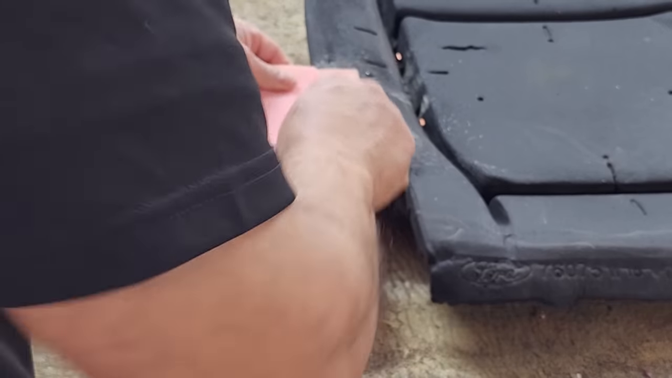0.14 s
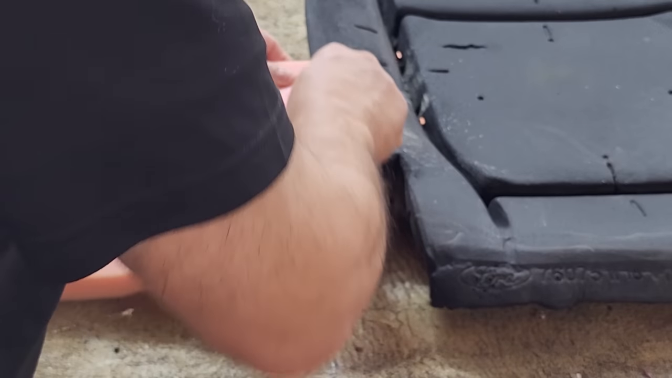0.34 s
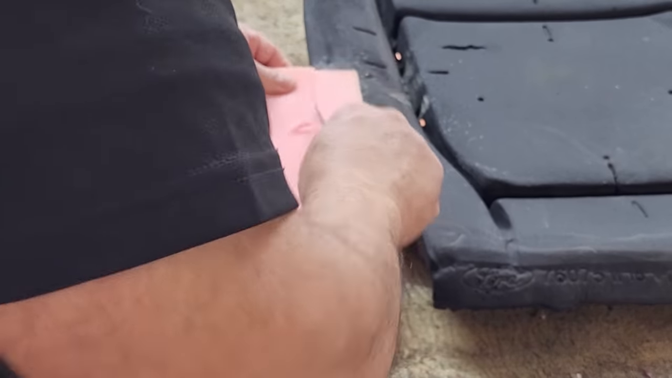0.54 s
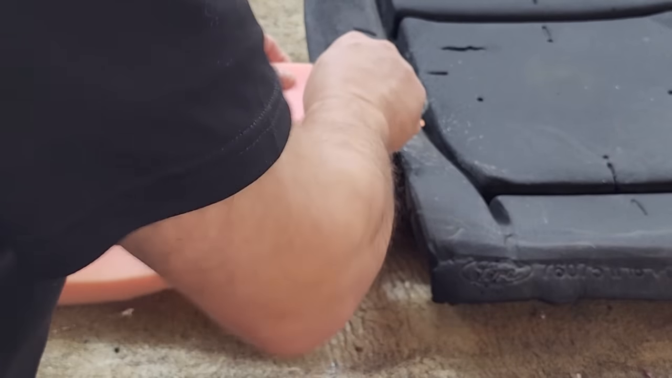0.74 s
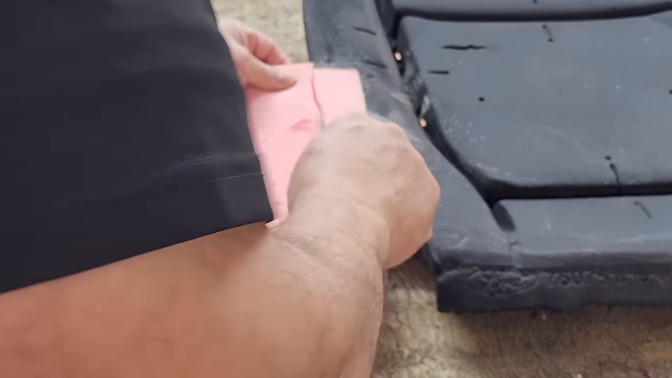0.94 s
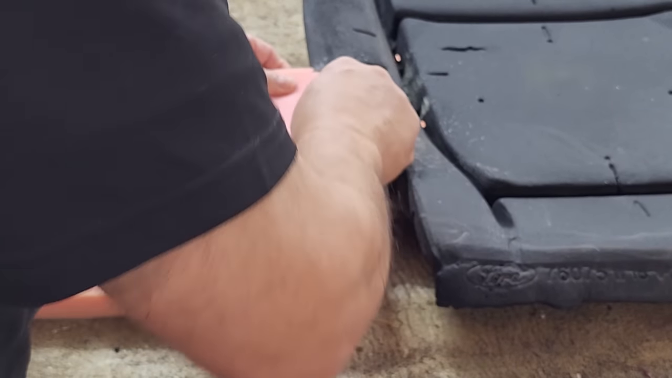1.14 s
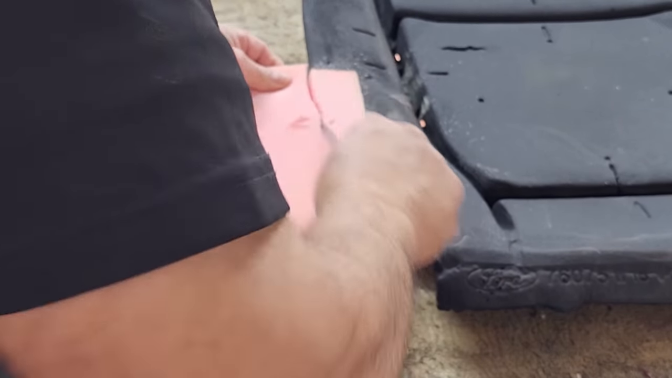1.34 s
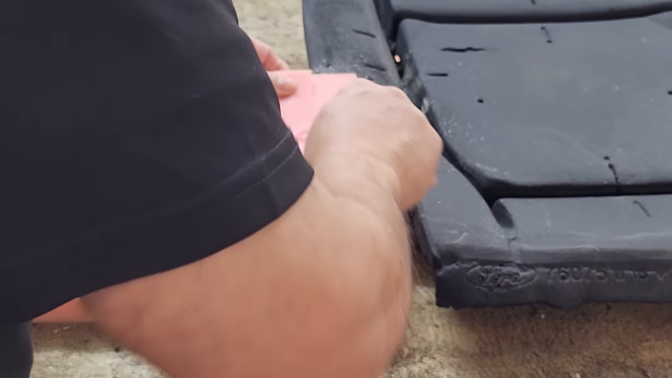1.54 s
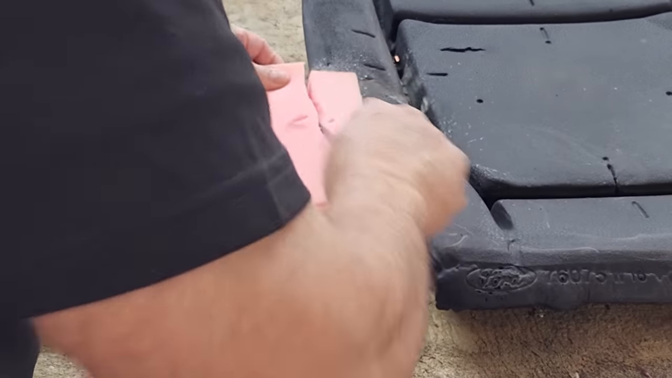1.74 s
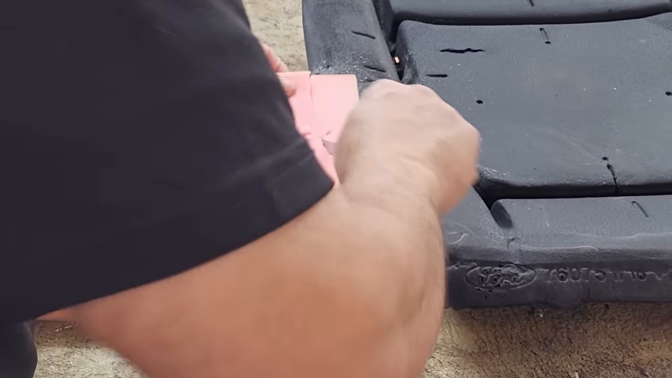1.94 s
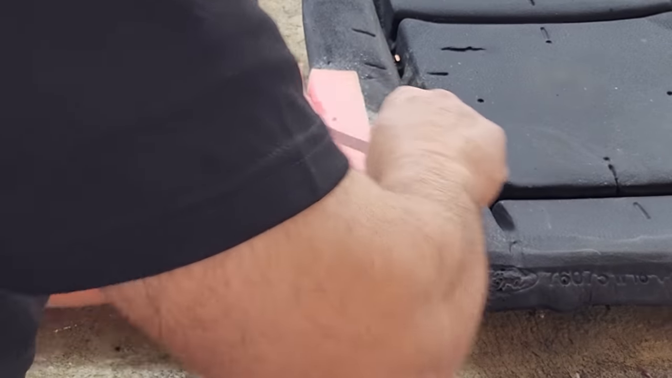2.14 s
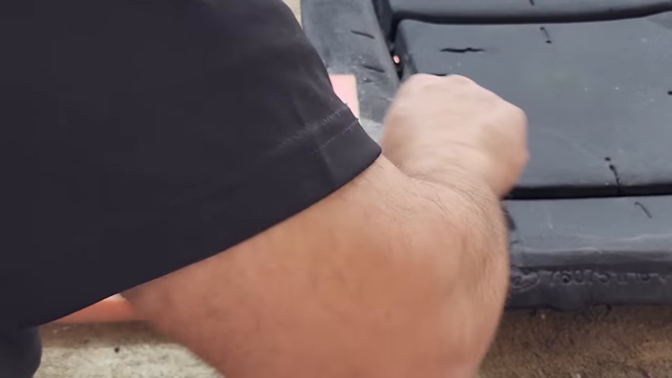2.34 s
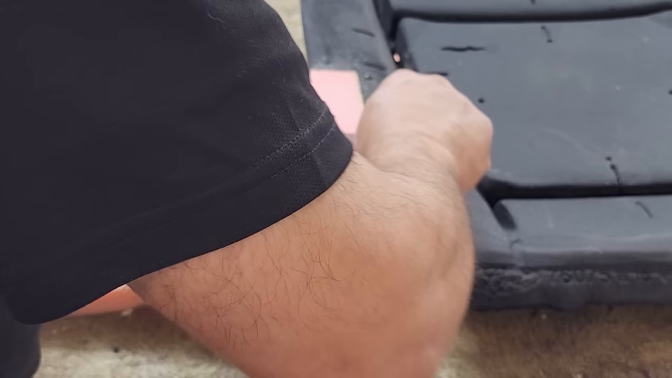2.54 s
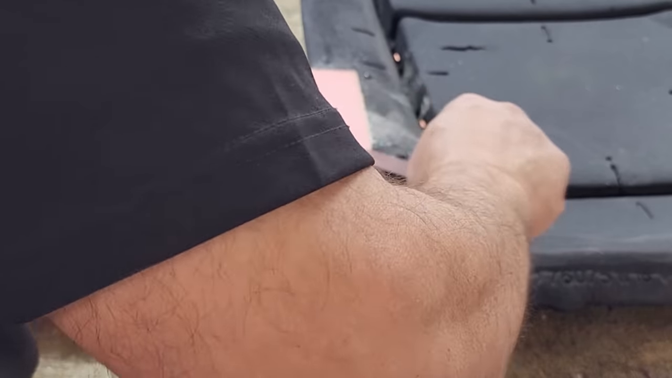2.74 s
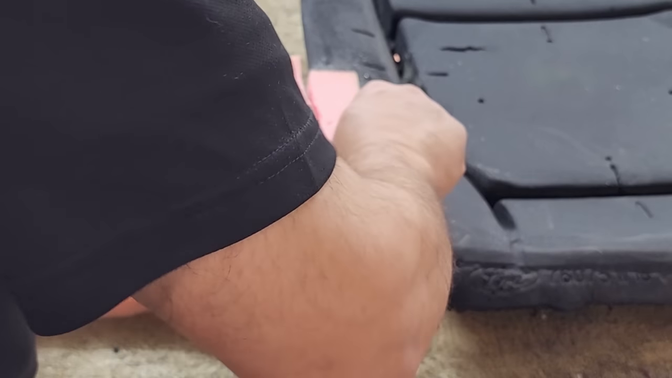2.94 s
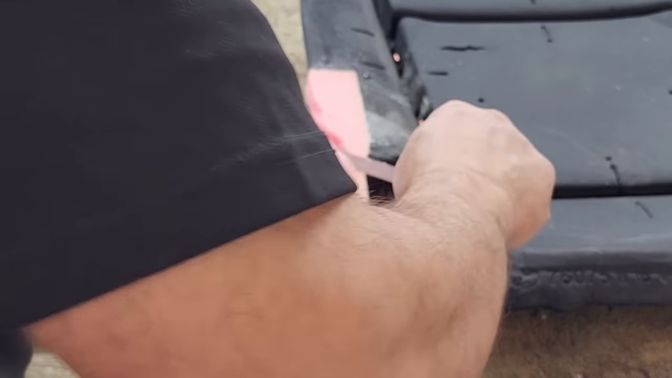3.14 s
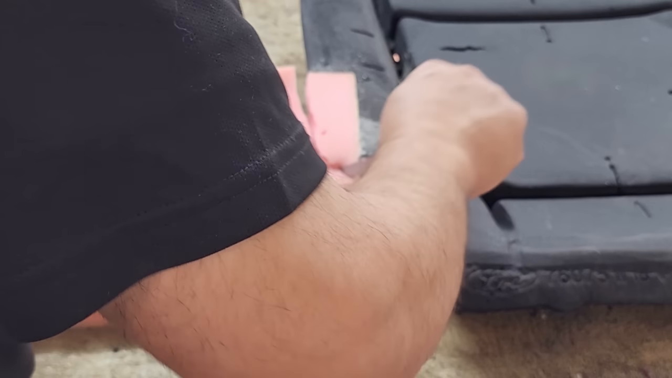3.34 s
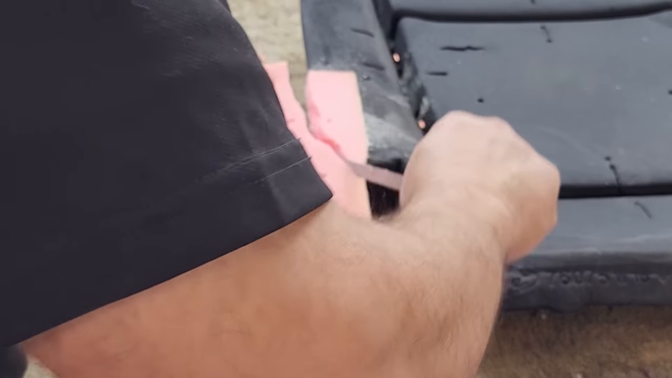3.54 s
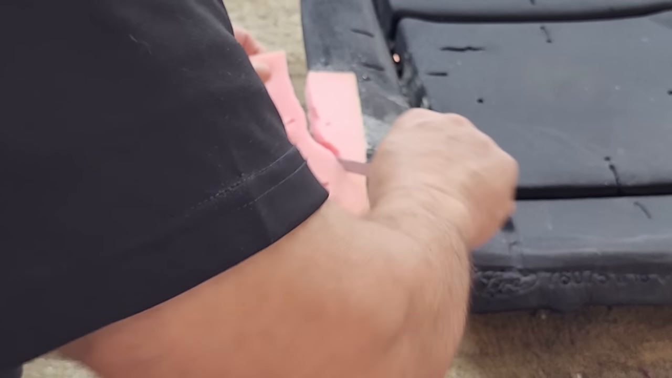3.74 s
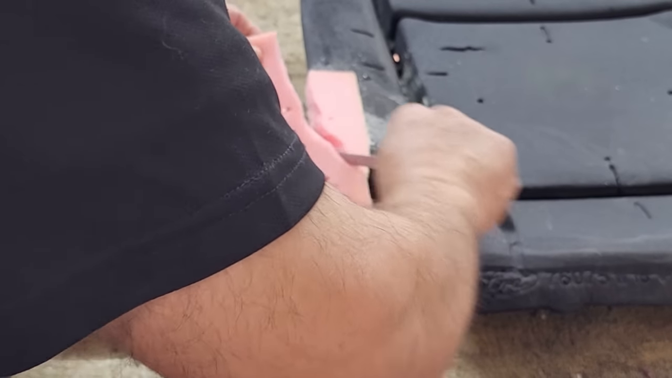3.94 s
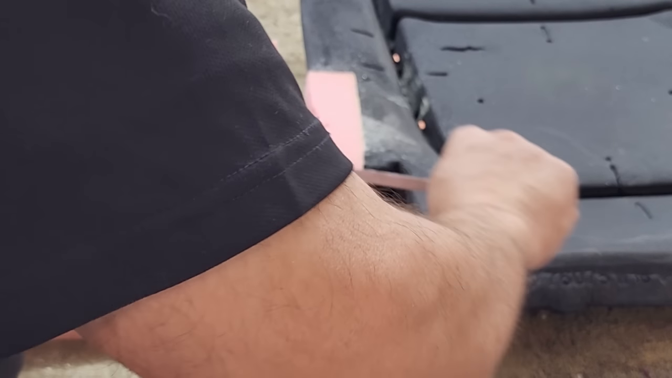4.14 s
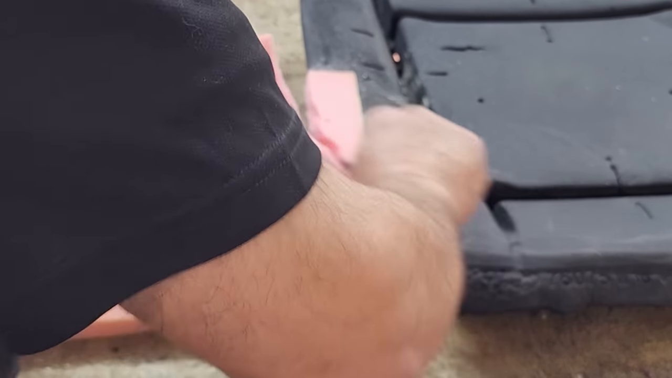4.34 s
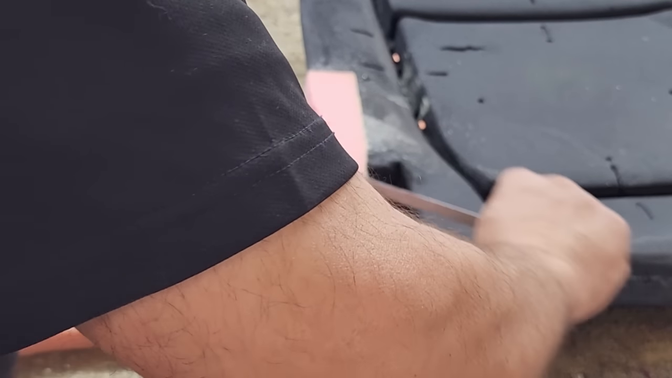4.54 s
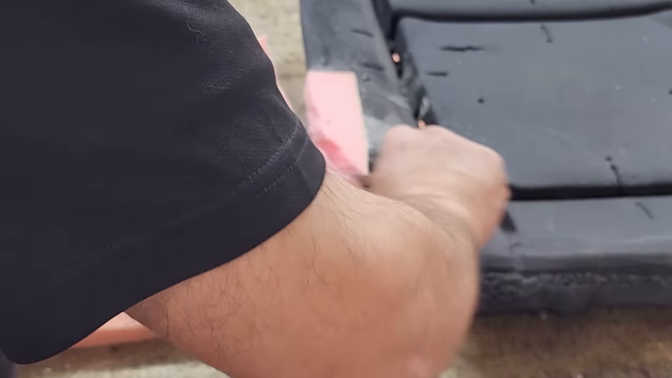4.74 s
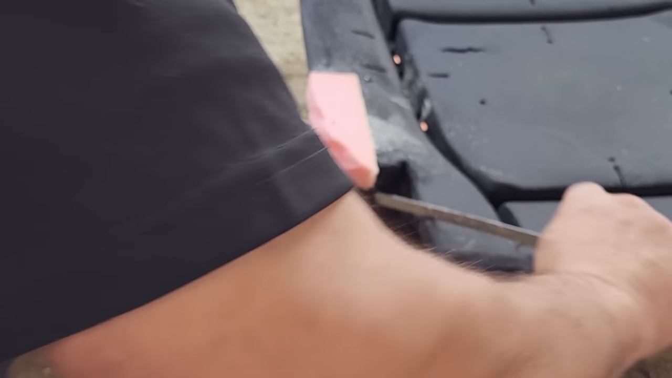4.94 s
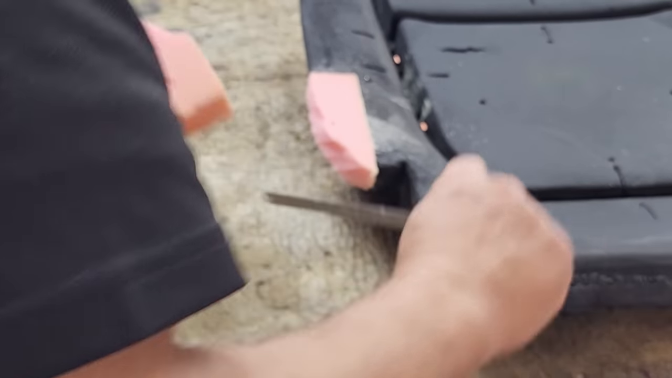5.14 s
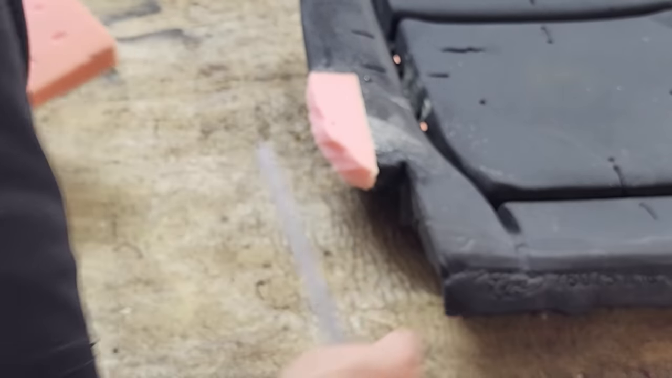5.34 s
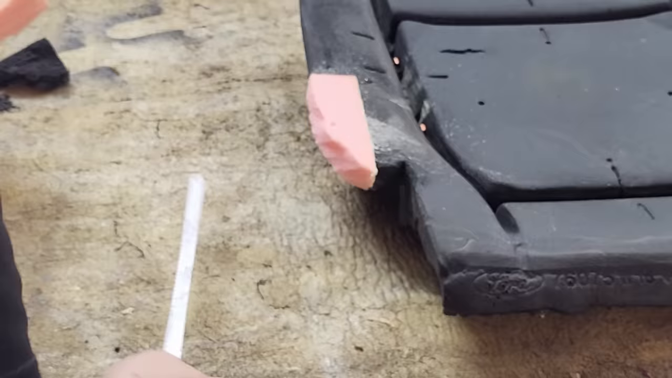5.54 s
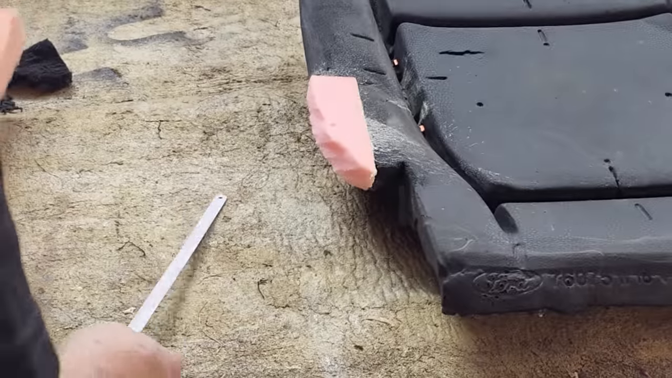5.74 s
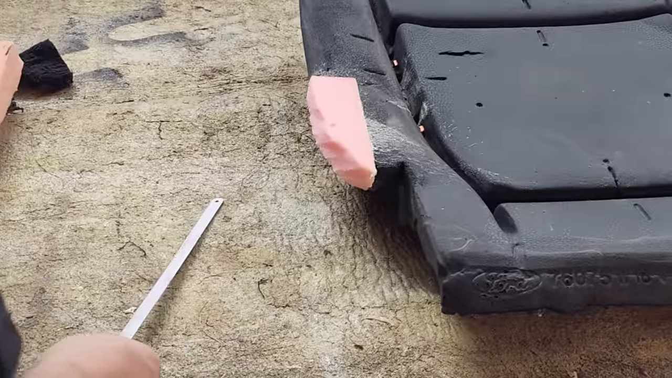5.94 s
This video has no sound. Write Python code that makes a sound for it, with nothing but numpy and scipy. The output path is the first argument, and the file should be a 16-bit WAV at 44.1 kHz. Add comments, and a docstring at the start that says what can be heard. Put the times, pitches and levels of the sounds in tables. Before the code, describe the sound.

A thin blade saws briskly back and forth through soft foam, juddering on pulls and hissing on pushes, then slips free and taps the bench.

```python
"""A long thin blade saws back and forth through soft foam on a wooden bench, close to a microphone pair.
Over a low steady drone each pull sticks and slips in a judder while cells tear; each push is a smoother
hiss, both made of filtered grains of noise. Teeth snag on strands in snaps, and now and then steel scrapes
the slab. The blade slides free and rings in decaying sines, and a light tap on the bench sounds its modes."""
import sys
import numpy as np
from scipy import signal
from scipy.io import wavfile

SR = 44100
rng = np.random.default_rng(int(sys.argv[2]) if len(sys.argv) > 2 else 0)


def put_to_file(sound):
    """Save the sound as 16-bit audio at rate SR, in the file named by the first command-line argument."""
    columns = np.atleast_2d(sound).T  # one column per channel
    safe = np.clip(columns, -1, 1)
    whole_steps = np.round(safe * 32767)
    wavfile.write(sys.argv[1], SR, whole_steps.astype(np.int16))


N = 268151
T = np.arange(N) / SR

# Pulls of the blade. Each row: start in seconds, length in seconds, run-up in seconds, swell over the stroke
# in dB, then relative levels of body, rasp and fizz in dB, and the hollow of the slit in Hz.
PULLS = [(-.03, .21, .03, -3.5, -37, -41, -47.5, 560), (.377, 0.25, 0.034, 10.5, -36.5, -38, -45, 556),
         (0.822, .25, 0.05, 13, -33, -37.5, -42, 594), (1.276, 0.23, 0.033, 8.5, -31.5, -37.5, -42, 608),
         (1.704, .25, 0.078, -4.5, -35.5, -39, -45, 610), (2.136, 0.24, 0.096, 0.5, -34, -40, -51, 600),
         (2.59, .25, 0.091, 4, -33.5, -39.5, -50, 626), (3.022, 0.27, 0.089, -0.5, -35, -39.5, -49, 670),
         (3.513, 0.16, 0.043, 5, -51.5, -49.5, -56, 850), (3.953, 0.26, 0.069, 5, -41.5, -46, -51, 750),
         (4.412, 0.23, 0.047, -0.5, -37.5, -43.5, -49.5, 733),
         (4.802, 0.14, 0.061, -3, -42, -47, -50.5, 840), (4.897, 0.17, 0.04, -4, -43.5, -54, -60, 760)]
# The foam's grip in each pull. Each row: hardest slip in seconds, time it takes to build and to ease in
# seconds, slips per second there, share of the tearing that falls on the slips (0-1), relative level of the
# judder in dB, added rocking of the block in dB.
GRIPS = [(.079, 0.078, 64, 0.65, -22.5, -45), (.503, 0.053, 68.6, 0.65, -24, -39),
         (.908, 0.076, 72.6, 0.28, -28.5, -46), (1.407, .055, 77, 0.34, -25, -47),
         (1.819, 0.058, 81, 0.32, -26, -49), (2.268, 0.037, 90, 0.14, -31.5, -48),
         (2.718, 0.039, 105.4, .03, -29.5, -46), (3.125, 0.064, 98, 0.17, -32, -51),
         (3.601, .04, 48, 0.16, -42, -54), (4.055, .06, 34, 0.38, -47, -44),
         (4.483, 0.067, 110, 0.65, -36, -45), (4.85, .04, 67, 0.17, -52, -56),
         (4.945, .055, 56, 0.13, -47, -40.5)]
PULL_BRAKE, PUSH_BRAKE = 0.63, 0.74  # share of a stroke over which the hand slows to the turn
RUN_UP_EASE = 1.16  # above 1 the blade starts more gently


def amp(db):
    """Decibels to gain."""
    return 10 ** (np.asarray(db) / 20)


def evened(x):
    """Scales to rms 1."""
    return x / np.sqrt(np.mean(x ** 2) + 1e-20)


def peaked(x):
    """Scales to peak 1."""
    return x / abs(x).max()


def read(points, hz):
    """Reads a table on a log-frequency axis."""
    f, value = np.transpose(points)
    return np.interp(np.log(hz + 1), np.log(f + 1), value)


def add(mix, s, sound):
    """Mixes a sound in at s seconds."""
    part = mix[max(round(s * SR), 0):][:len(sound)]
    part += sound[:len(part)]


def coloured(x, points, size=8192):
    """Causal minimum-phase filter with the given spectrum, so that clicks keep their attack."""
    log_gain = np.log(amp(read(points, abs(np.fft.fftfreq(size, 1 / SR)))))
    spectrum = np.exp(np.conj(signal.hilbert(log_gain)))
    taps_of_filter = np.fft.ifft(spectrum).real[:size // 2]
    return signal.fftconvolve(x, taps_of_filter)[:len(x)]


def band(x, low_hz, high_hz):
    """Band-pass with rms 1."""
    edges = [low_hz, min(high_hz, SR / 2 - 1)]
    sos = signal.butter(N=3, Wn=edges, btype="band", fs=SR, output="sos")
    return evened(signal.sosfilt(sos, x))


def drift(per_s):
    """Smooth chance with rms 1: straight lines between per_s random values a second."""
    knots = rng.standard_normal(N // 10)
    return evened(np.interp(T * per_s, np.arange(len(knots)), knots))


def burst(decay_s):
    """A puff of noise that dies away exponentially."""
    t = T[:SR // 3]
    return rng.standard_normal(len(t)) * np.exp(-t / decay_s)


def ringing(modes):
    """Impulse response of a set of modes, with energy 1."""
    t = T[:SR // 2]
    ring = sum(amp(db - 60 * t / t60) * np.sin(2 * np.pi * hz * t) for hz, db, t60 in modes)
    return ring / np.linalg.norm(ring)


def resonate(x, hz, width_hz):
    """A resonance of gain 1 that follows the curve hz: shift it down to zero, smooth, shift back."""
    turn = np.exp(2j * np.pi * np.cumsum(hz) / SR)
    r = np.exp(-np.pi * width_hz / SR)
    return 2 * (turn * signal.lfilter([1 - r], [1, -r], x / turn)).real


def motion(stroke, brake):
    """A quick run-up and a long slowing: the samples of a stroke, its progress 0-1 and the blade's speed 0-1."""
    start, length, run_up = stroke[:3]
    during = (T >= start) & (T < start + length)
    t = T[during] - start
    rise = np.minimum(t / run_up, 1)
    fall = np.clip((1 - t / length) / brake, 0, 1)
    speed = np.sin(np.pi / 2 * rise) ** RUN_UP_EASE * np.sin(np.pi / 2 * fall) ** 2
    return during, t / length, speed


def level(strokes, brake, laws):
    """Gains of body, rasp and fizz: each grows with the blade's speed, and swells or fades over the stroke."""
    gains = np.zeros((3, N))
    for stroke in strokes:
        during, progress, speed = motion(stroke, brake)
        swell_db, *layer_db = stroke[3:7]
        for gain, db, (power, extra_db) in zip(gains, layer_db, laws):
            swell = (swell_db + extra_db) * (progress - .5)
            gain[during] += amp(db + swell) * speed ** power
    return gains


def grip(s, width_s):
    """A bell in time around the hardest slip."""
    return np.exp(-np.minimum(abs(T - s) / width_s, 10) ** 2)


def tearing(per_s, spread_db, rub):
    """Cell walls snapping at random moments, most small and a few large, over plain rubbing noise."""
    sizes = amp(spread_db * np.minimum(rng.exponential(1, N), 4)) * rng.choice([-1, 1], N)
    cracks = evened(sizes * (rng.random(N) < per_s / SR))
    return evened(cracks + rub * rng.standard_normal(N))


def cut(levels, snaps, fine, colour, blade_db, hiss_db):
    """Coarse snaps sound through block and blade as body and rasp; the finest cells fizz, with a hiss between."""
    # Modes of the blade. Each row: pitch in Hz, relative level in dB, time to fall 60 dB in seconds.
    blade_modes = [(293.5, -1, 0.41), (538, -44, 0.51), (720, -19, 0.05), (859, 12, 0.49), (1067, 11, 0.56),
                   (1247, 12, 0.12), (1434, 11, 0.15), (1510, -8, 0.44), (2107, 2, 0.47), (2180, 8, 0.19),
                   (2400, 7, 0.09), (2595, -21.5, 0.04)]
    steel = signal.fftconvolve(snaps, ringing(blade_modes))[:N]
    coarse = evened(coloured(snaps, colour)) + amp(blade_db) * evened(steel)
    treble = coloured(fine, colour)
    body, rasp, fizz = levels
    hiss = amp(hiss_db) * np.sqrt(abs(rasp * fizz))
    low = band(coarse, 139, 1380) * body + band(coarse, 1556, 3240) * rasp
    return low + band(treble, 3640, 8270) * hiss + band(treble, 9460, 14900) * fizz


def background():
    """A steady low drone, faint hiss and whines, and the block rocking under the hands at each pull."""
    # Colour of the steady background drone and hiss. Each row: frequency in Hz, relative density in dB per Hz.
    drone_colour = [(12, -24), (20, -65), (38, 0.5), (96, 4.5), (177, -14), (319, -24.5), (2140, -35),
                    (3840, -43), (4670, -39), (5380, -52.5), (7110, -41.5), (8890, -55), (9670, -54.5),
                    (14700, -48), (16000, -50)]
    # Colour of the rumble of the block. Each row: frequency in Hz, relative density in dB per Hz.
    rumble_colour = [(15, -29), (28, 4), (40, 8.5), (55, 14), (80, 1), (130, -1), (300, -31), (700, -38)]
    # Faint whines. Each row: centre pitch in Hz, rms level in dB.
    whines = [(2205, -86), (4802, -86.5)]
    handling_db, rock_s = -57.5, 0.096  # steady rumble of the hands; half-width of each rocking
    drone = amp(-51) * evened(coloured(rng.standard_normal(N), drone_colour))
    whine = np.zeros(N)
    for hz, db in whines:
        wandering_hz = hz + 8 * drift(30)
        whine += amp(db) * evened(np.sin(2 * np.pi * np.cumsum(wandering_hz) / SR))
    sway = amp(handling_db) + sum(amp(db) * grip(hardest, rock_s) for hardest, *_, db in GRIPS)
    return drone + whine + evened(coloured(rng.standard_normal(N), rumble_colour)) * sway


def stick_slip(jitter, burst_turns):
    """The foam grips the blade and lets go: one kick a slip, the surge of tearing after it, the slips' share."""
    glide_hz_per_s = 19  # the slips quicken as the pull goes on
    turns, share = np.zeros(N), np.zeros(N)
    for (start, *_), (hardest, _, per_s, depth, *_) in zip(PULLS, GRIPS):
        during = T >= start
        t = T[during] - hardest
        turns[during] = per_s * t + glide_hz_per_s * t ** 2 / 2
        share[during] = depth
    turns += jitter * drift(70)
    kicks = np.diff(np.floor(turns), prepend=np.floor(turns[0])) == 1  # a slip at each whole turn
    force = amp(2.2 * drift(80))
    surge = evened(np.exp(-(turns % 1) / burst_turns) * force)
    return kicks * force, np.sqrt(1 - share + share * surge ** 2), share


def judder(kicks):
    """The slips shake the block, most where the foam grips hardest."""
    # Colour of the judder. Each row: frequency in Hz, relative density in dB per Hz.
    judder_colour = [(20, -27), (45, -4.5), (66, 4.5), (100, -2.5), (150, -6.5), (200, -13), (280, -17),
                     (400, -16.5), (700, -55), (2000, -55)]
    base_db = -15  # judder all through a pull, relative to that at the hardest slip
    gain = np.zeros(N)
    for pull, (hardest, build_s, _, _, db, _) in zip(PULLS, GRIPS):
        during, _, speed = motion(pull, PULL_BRAKE)
        gain += amp(db) * grip(hardest, build_s)
        gain[during] += amp(db + base_db) * speed
    return evened(coloured(kicks - kicks.mean(), judder_colour)) * gain


def pulls():
    """The teeth bite: the block judders and the tearing comes in surges, each led by a crack."""
    # Colour of a pull. Each row: frequency in Hz, relative density in dB per Hz.
    pull_colour = [(120, -13), (200, 2), (310, -2), (590, -4.5), (850, -7), (1200, -11.5), (1600, -14.5),
                   (2100, -13.5), (2700, -11), (3600, -16), (5400, -15.5), (7500, -24.5), (10000, -41),
                   (15500, -37.5)]
    # How body, rasp and fizz follow the blade. Each row: power of its speed, extra swell over the stroke in dB.
    pull_laws = [(1.51, -1.5), (1.28, -2.1), (1.17, 4)]
    bite_hz, bite_wander = 2250, 0.21  # the slit rings near this pitch and wanders as the teeth wobble
    kicks, surge, share = stick_slip(jitter=.045, burst_turns=.24)
    snaps = tearing(per_s=2600, spread_db=3.0, rub=0.68) * surge + amp(16.5) * kicks * share
    fine = tearing(per_s=7000, spread_db=4.5, rub=0.98) * surge ** 0.13 + 0.34 * snaps
    start, length, *_, hollow_hz = np.transpose(PULLS)
    hollow = resonate(snaps, np.interp(T, start + length / 2, hollow_hz), width_hz=180)
    bite = resonate(snaps, bite_hz * (1 + bite_wander * drift(22)), width_hz=230)
    levels = level(PULLS, PULL_BRAKE, pull_laws)
    coarse = snaps + amp(-1.5) * hollow + amp(-2.5) * bite
    sawn = cut(levels, coarse, fine, pull_colour, blade_db=-12, hiss_db=0.0)
    return amp(-0.36) * sawn + amp(-3.0) * judder(kicks)


def pushes():
    """The backs of the teeth slide through: fine, even grains in a slit whose resonances shift with the blade."""
    # Pushes of the blade. Each row: start in seconds, length in seconds, run-up in seconds, swell over the
    # stroke in dB, relative levels of body, rasp and fizz in dB, top of the hollow in Hz, rasp at the start
    # in Hz, relative level of the shudder in dB.
    strokes = [(0.158, 0.22, 0.042, 14, -38.5, -39, -40.5, 846, 2880, -31.5),
               (0.611, 0.21, 0.046, 6, -39.5, -41.5, -42, 850, 3030, -40),
               (1.07, 0.24, 0.031, 1.5, -44, -46, -47.5, 856, 2870, -39),
               (1.504, 0.24, 0.047, 2, -40, -40.5, -43.5, 930, 3050, -42.5),
               (1.932, 0.24, 0.077, -8.5, -43, -43, -48, 1022, 3100, -46),
               (2.366, 0.25, 0.063, -3, -40.5, -41.5, -57, 684, 3250, -37),
               (2.825, 0.26, 0.066, -13, -48, -46, -55.5, 756, 3280, -46.5),
               (3.262, 0.21, 0.039, 3, -56.5, -54, -58, 730, 3130, -49),
               (3.336, 0.038, 0.0079, -7, -43, -46, -72, 730, 2100, -47),
               (3.725, 0.095, 0.019, -9, -56, -63, -65.5, 880, 2900, -44.5),
               (3.778, .19, 0.048, -2, -59.5, -58, -68.5, 684, 3200, -61),
               (4.183, 0.2, 0.047, -3.5, -51, -49, -55, 720, 3220, -53),
               (4.301, 0.12, .03, -2, -59.5, -51, -72, 670, 2320, -51),
               (4.605, 0.061, .016, -12, -48, -55.5, -53.5, 670, 2950, -47),
               (4.676, 0.076, .022, -7, -58.5, -58.5, -63, 860, 2900, -49)]
    # Colour of a push. Each row: frequency in Hz, relative density in dB per Hz.
    push_colour = [(80, 7), (200, -0.5), (420, 8.5), (700, 6), (1000, 3), (1400, 0), (2100, -10.5),
                   (3100, -8), (4200, -1.5), (5700, 4), (8000, -2.5), (11000, -10.5), (14000, -8.5),
                   (16000, -5.5)]
    # How body, rasp and fizz follow the blade. Each row: power of its speed, extra swell over the stroke in dB.
    push_laws = [(.65, -4), (1.03, -1.5), (1.3, -4)]
    hollow_arch, rasp_sag = 0.33, 0.47  # shares by which the hollow arches up and the rasp sags to the end
    grains = tearing(per_s=7000, spread_db=3.5, rub=0.52) * amp(0.72 * drift(90))
    hollow_hz, rasp_hz, shake = np.zeros((3, N))
    for push in strokes:
        during, progress, speed = motion(push, PUSH_BRAKE)
        top_hz, start_hz, shudder_db = push[7:]
        hollow_hz[during] = top_hz * (1 - hollow_arch * (1 - np.sin(np.pi * progress)))
        rasp_hz[during] = start_hz * (1 - rasp_sag * progress ** 3)
        shake[during] += amp(shudder_db) * speed ** 0.38
    moving = hollow_hz > 0  # between pushes the pitches glide on to the next
    hollow = resonate(grains, np.interp(T, T[moving], hollow_hz[moving]), width_hz=70)
    rasp = resonate(grains, np.interp(T, T[moving], rasp_hz[moving]), width_hz=680)
    shudder = band(rng.standard_normal(N), 61.7, 129.3) * shake
    levels = level(strokes, PUSH_BRAKE, push_laws)
    coarse = grains + amp(7.5) * hollow + amp(11) * rasp
    slid = cut(levels, coarse, grains, push_colour, blade_db=-16.5, hiss_db=-0.5)
    return amp(0.07) * slid + amp(-2.5) * shudder


def snags():
    """A strand catches and parts, or the blade slips hard: a snap, a thud of the block and a spit of treble."""
    # Teeth catching on strands, and the hardest slips of the pull around 4.05 s, a regular run at about # 37 a
    # second from 4.00 to 4.11 s. Each row: time in seconds, relative level of the snap in dB, then thud # and
    # treble in dB relative to the snap.
    catches = [(0.393, -24.5, 2, -7), (.443, -21, -13, -5), (.458, -27, -5, -16), (.85, -33, 1, -15),
               (1.09, -38, -8, -5), (1.293, -28, 7, -4), (1.723, -32, 6, -1), (2.231, -23.5, 5, -24),
               (3.338, -22.5, -1.5, -28), (3.35, -33.5, 13.5, -15), (3.54, -29.5, -8, -6),
               (3.578, -29, 1.5, -14), (3.6, -26, -2, -18), (3.979, -29, -13, -15),
               (4.002, -23.5, -7.5, -18), (4.029, -19.5, -10, -21), (4.054, -19.5, -15, -21),
               (4.081, -18.5, -18, -26), (4.113, -26.5, -4, -15), (4.21, -26, -9.5, -13),
               (4.423, -16, -7, -16), (4.454, -18.5, -4.5, -22), (4.482, -15.5, -5, -26),
               (4.836, -25, -8, -20)]
    # Colour of a snap. Each row: frequency in Hz, relative density in dB per Hz.
    snap_colour = [(150, -30), (500, 9), (1100, 6.5), (1500, 1.5), (2000, -4.5), (3000, -7.5), (4500, -4.5),
                   (9000, -24.5)]
    out = np.zeros(N)
    thud = peaked(ringing([(157.0, 0.5, 0.077), (270, -5.5, 0.017)]))
    for s, db, thud_db, treble_db in catches:
        puff = burst(decay_s=.003)
        spit = peaked(signal.lfilter([1], [1, -.6], band(puff, 3500, 14000)))
        add(out, s, amp(db) * (peaked(coloured(puff, snap_colour)) + amp(treble_db) * spit))
        add(out, s, amp(db + thud_db) * thud)
    return amp(-7.0) * out


def skids():
    """Short scrapes of steel on the edge of the slab under the foam: a gritty contact and a midrange ring."""
    # Knocks and skids. Each row: time in seconds, level of the ring in dB, decay of the contact in seconds.
    contacts = [(3.466, -25.5, 0.0055), (4.906, -26, 0.0035), (4.918, -27, 0.0045), (4.931, -26.5, 0.0034),
                (4.944, -28, 0.01), (4.96, -34, 0.0094)]
    # Modes of the scraped steel. Each row: pitch in Hz, relative level in dB, time to fall 60 dB in seconds.
    skid_modes = [(880, -8, 0.043), (1147, -8.5, 0.17), (1405, 5.5, 0.015), (1540, 6, 0.017),
                  (1840, -7, 0.027), (1964, 1.5, 0.036), (2060, 0, 0.026), (3180, -13, 0.034)]
    out = np.zeros(N)
    for s, db, contact_s in contacts:
        grit = burst(decay_s=contact_s)
        ring = signal.fftconvolve(grit, ringing(skid_modes))[:len(grit)]
        add(out, s, amp(db) * (peaked(band(ring, 420, 4500)) + amp(-6) * peaked(band(grit, 970, 3450))))
    return out


def free_ring(rise_s=0.0068):
    """The last teeth leave the foam and the undamped blade sings briefly."""
    # The free blade. Each row: start in seconds, pitch in Hz, level before the soft rise in dB, time to fall
    # 60 dB in seconds.
    tones = [(4.925, 880, -33, 0.19), (4.946, 541, -32, 0.18)]
    out, t = np.zeros(N), T[:SR // 2]
    for s, hz, db, t60 in tones:
        envelope = amp(db - 60 * t / t60) * (1 - np.exp(-t / rise_s))
        add(out, s, envelope * np.sin(2 * np.pi * hz * t))
    return out


def taps():
    """The hand with the blade comes down on the bench: a dull clatter, then it settles."""
    # Blows on the bench. Each row: time in seconds, level of the blow in dB, tick in dB relative to the blow.
    blows = [(5.585, -27.5, -25), (5.593, -29, -34), (5.601, -32, -31), (5.612, -43.5, -9),
             (5.621, -46, -33), (5.687, -44, -8.5), (5.852, -49.5, -26), (5.862, -45.5, -14)]
    # Colour of a blow. Each row: frequency in Hz, relative density in dB per Hz.
    tap_colour = [(50, -25), (170, 7), (300, 7), (450, 5), (900, -0.5), (1400, -6), (2000, -9), (2600, -21),
                  (4000, -22), (6000, -29), (12000, -57)]
    # Modes of the bench. Each row: pitch in Hz, relative level in dB, time to fall 60 dB in seconds.
    bench_modes = [(173, 1, 0.23), (250.4, -2.5, 0.24), (440, -7, 0.049), (530, -4, 0.2), (745, -4, 0.096),
                   (886, -4, 0.043), (1184, -7, 0.061), (1410, -19, 0.11), (1770, -17, 0.044)]
    out, wood = np.zeros(N), peaked(ringing(bench_modes))
    for s, db, tick_db in blows:
        puff = burst(decay_s=.005)
        tick = peaked(band(puff, 3900, 8100))
        add(out, s, amp(db) * (peaked(coloured(puff, tap_colour)) + amp(tick_db) * tick))
        add(out, s, amp(db - 7.5) * wood)
    return out


def bounced(x):
    """Close surfaces comb the sound, at the same overall level."""
    # Bounces off bench, slab and arm. Each row: delay in seconds, level in dB relative to the direct sound.
    bounces = [(.0011, -36), (.0023, -30), (.0041, -30), (.0062, -29), (.0087, -19.5), (0.0116, -15.5)]
    out = x.copy()
    for delay_s, db in bounces:
        add(out, delay_s, amp(db) * x)
    return out * x.std() / out.std()


def room(x, gap_s=0.0037):
    """Dense reflections of the workshop, each band dying at its own speed."""
    # Decay of the workshop. Each row: frequency in Hz, time to fall 60 dB in seconds.
    decay = [(100, 0.91), (500, 0.31), (2000, 0.49), (6000, 0.43), (15000, 0.17)]
    hz, t, z = signal.stft(rng.standard_normal(SR // 2), SR, nperseg=256)
    tail = signal.istft(z * amp(-60 * t / read(decay, hz)[:, None]), SR, nperseg=256)[1]
    tail = np.r_[np.zeros(round(gap_s * SR)), tail / np.linalg.norm(tail)]
    return signal.fftconvolve(x, tail)[:N]


def two_ports(mid, size=256):
    """Scattered sound reaches the two ports in ever-changing phase: bass stays central, treble spreads."""
    # Width of the microphone pair. Each row: frequency in Hz, side minus mid in dB.
    width = [(25, -29), (60, -13), (125, -18.5), (250, -24.5), (500, -13.5), (1000, -7), (2000, -5),
             (4000, -2.5), (7500, 0.5), (14000, -2)]
    # Lean of the microphone pair. Each row: frequency in Hz, left minus right in dB.
    lean = [(60, -0.3), (120, -0.4), (240, -0.5), (480, -0.5), (950, 1), (1890, -0.5), (3770, 0.1),
            (7520, -2), (15000, 0)]
    z = signal.stft(mid, nperseg=size)[2]
    random_phase = np.exp(2j * np.pi * rng.random(z.shape))
    scattered = signal.istft(z * random_phase, nperseg=size)[1][:N]
    side = coloured(evened(scattered) * mid.std(), width)
    ports = []
    for sign in (1, -1):  # left, right
        half_lean = [(hz, sign * db / 2) for hz, db in lean]
        ports.append(coloured(mid + sign * side, half_lean))
    return np.array(ports)


def scene():
    """Sawing and tap in the workshop, close to the microphone pair."""
    sawing = bounced(pulls() + pushes() + snags()) + skids() + free_ring()
    knocks = taps()
    wet = room(amp(-11) * sawing + amp(-3.5) * knocks)
    return two_ports(sawing + knocks + wet + background())


def record(dry):
    """The recorder's band limit: a steep linear-phase low-pass."""
    edge_hz = 15900
    low_pass = signal.firwin(511, edge_hz, window=("kaiser", 9), fs=SR)
    return signal.oaconvolve(dry, low_pass[None], "same")


dry = scene()
out = record(dry)
put_to_file(out)
```